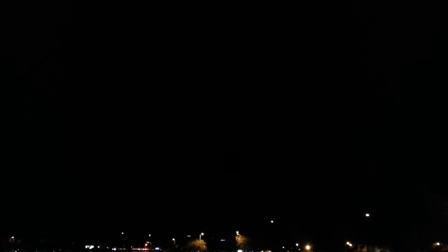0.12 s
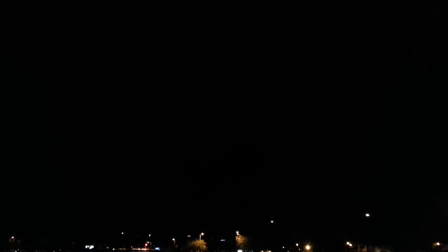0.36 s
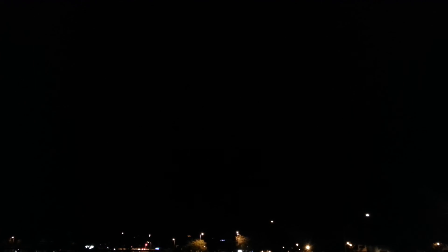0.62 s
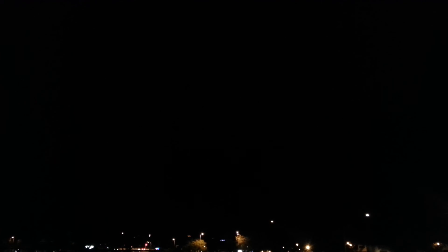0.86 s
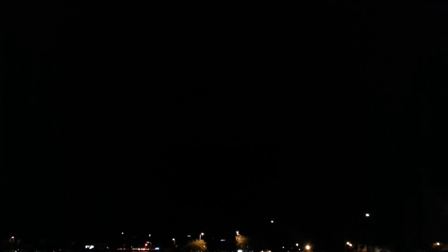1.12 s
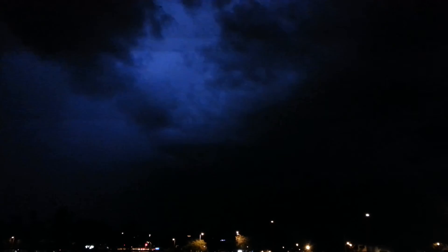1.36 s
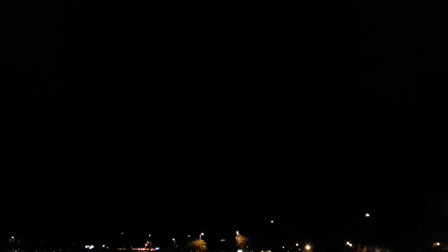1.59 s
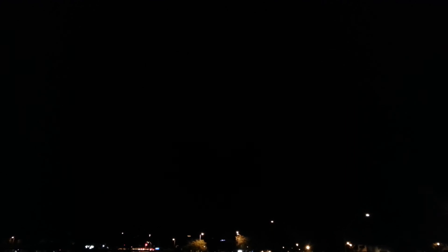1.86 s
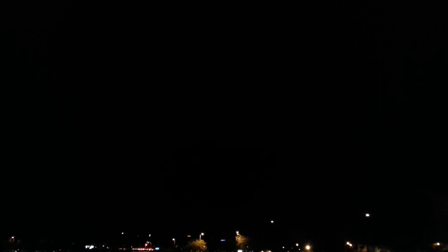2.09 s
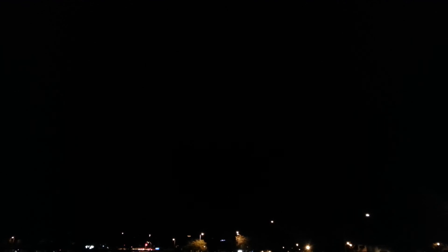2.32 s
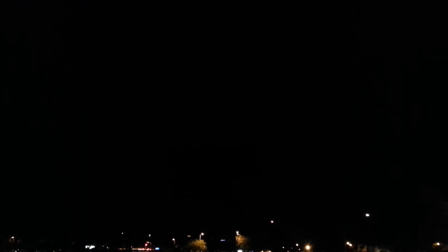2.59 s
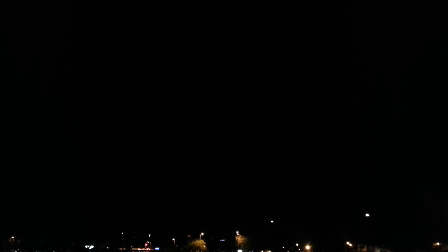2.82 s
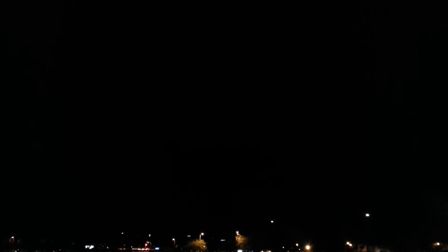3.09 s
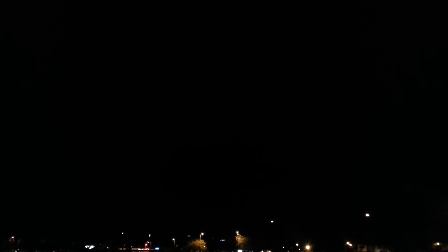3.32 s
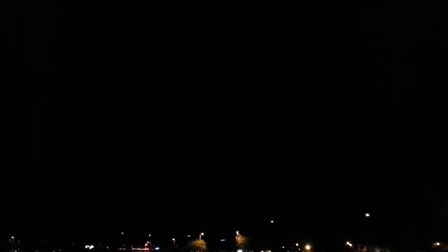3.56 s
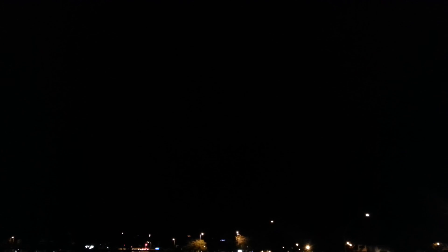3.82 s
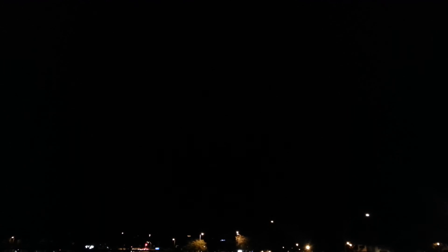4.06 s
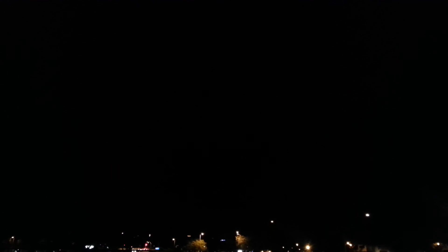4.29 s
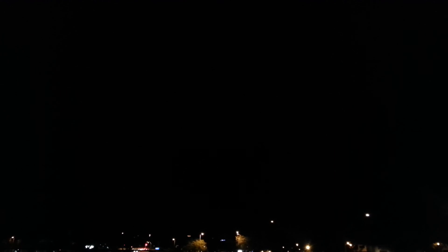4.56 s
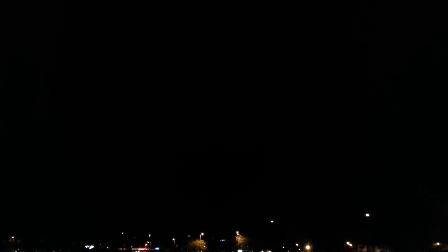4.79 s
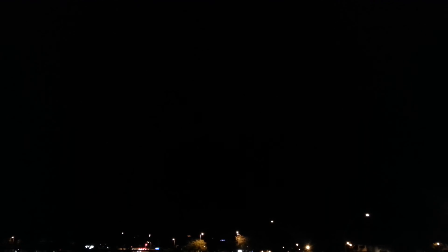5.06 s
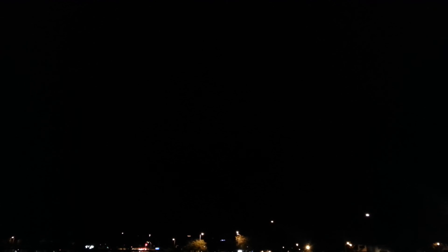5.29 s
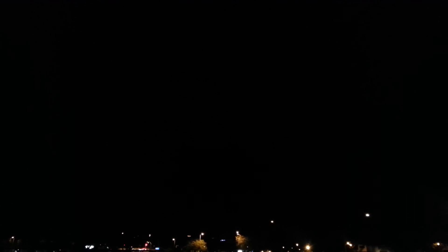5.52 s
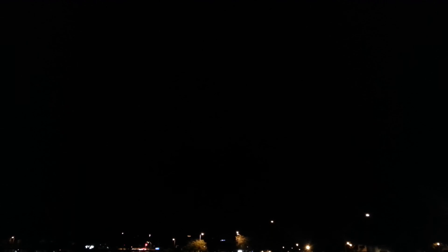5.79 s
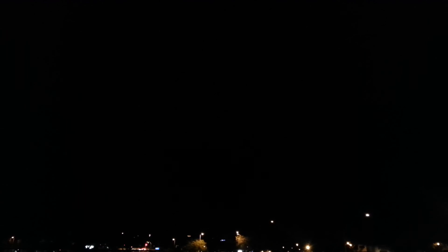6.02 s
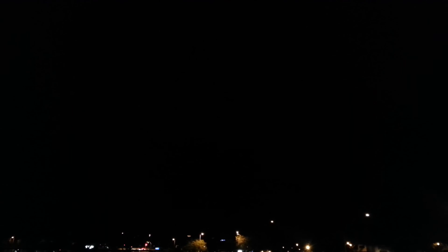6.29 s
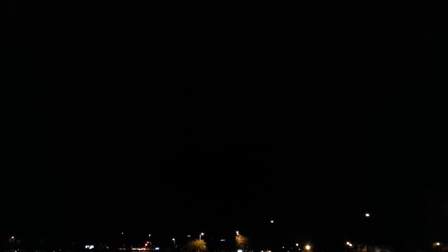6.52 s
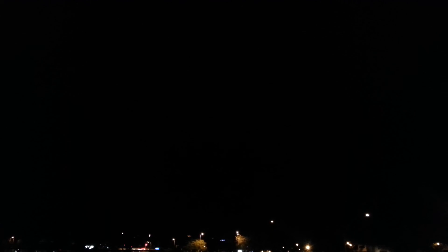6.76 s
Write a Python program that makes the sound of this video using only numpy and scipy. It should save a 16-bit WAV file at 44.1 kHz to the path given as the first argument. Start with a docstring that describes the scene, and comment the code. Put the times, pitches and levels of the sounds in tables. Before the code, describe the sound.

An open night landscape with distant lights, heard through two spaced microphones. At first there is only smooth, faint rain hiss and a low murmur; from about 0.3 s small crackles and a brief patter build. At 0.63 s a near lightning strike cracks with an instant, violent onset, several hard bangs crowded together and clipping. From 0.8 to 3 s rough, tearing thunder continues, with sharp claps knocking through booming peals, heavy low-mid resonance around 2.2 to 2.6 s and another strong blow near 3.1 s. Between 3.2 and 4 s the roll tumbles, briefly thinner, then punches again at 4 s and around 4.5 to 4.7 s. Afterward the peals grow duller and farther off, surging around 4.9, 5.7, 6.1 and 6.5 s with dips between. Rumble still rolls at the 6.9 s end, over soft rain. The image is wide, slightly stronger left.

```python
"""Thunder from a near lightning strike, heard in the open through two spaced microphones.
Shocks from the kinks of the channel crowd into a patter, a crack, then a long roll: random pulses coloured in bands,
dulled by the air path, raised in peals. Straight limbs add single claps: short uneven tone bursts.
Far rain hisses behind: shaped noise. The loudest claps overload the input."""
import sys
import numpy as np
from scipy import signal
from scipy.io import wavfile

SR = 44100
rng = np.random.default_rng(int(sys.argv[2]) if len(sys.argv) > 2 else 0)


def gain_from_db(level_db):
    """Turn a decibel level (scalar or array-like) into a linear amplitude factor."""
    decades = np.asarray(level_db, float) / 20
    return 10 ** decades


def wrap_up_sound(samples):
    """Save the sound to the file named by the first command line argument, as 16-bit audio."""
    columns = np.atleast_2d(samples).T
    # keep every value between -1 and 1, then stretch to whole-number steps
    tamed = np.clip(columns, -1, 1)
    steps = np.round(tamed * 32767).astype(np.int16)
    wavfile.write(sys.argv[1], SR, steps)


N = 303849

# uneven roll under the peals: t/s, level/dB
ROLL_LEVEL = [(0, -37), (.44, -33), (.6295, -29), (.631, -15), (1.5, -13.5), (2.7, -14), (3.0, -21.5),
              (4.2, -20), (4.43, -27.5), (4.9, -16.5), (5.27, -29.5), (5.6, -15), (6.0, -26), (6.89, -20.5)]
# peals swelling out of the roll: t of top/s, level/dB, fade/(dB/s), boom near 200 Hz/dB
PEALS = [(0.306, -29, 201, -2.5), (0.469, -28.5, 401.5, -5.5), (0.552, -18.5, 103, -8.5),
         (.632, -7, 100, -2), (.72, -17, 30.5, 1), (0.801, -14.5, 24, -9), (1.182, -10, 47.5, -11.5),
         (1.4, -14, 25, 0.5), (1.678, -14.5, 17, 2.5), (1.93, -15, 58.5, 7), (1.989, -18, 47.5, 0),
         (2.181, -11.5, 102.5, 0.5), (2.292, -17, 19, 15), (2.499, -12.5, 81, 5), (2.58, -19.5, 21, 14),
         (2.828, -8.5, 66.5, -2), (3.068, -10, 153, 5), (3.172, -11.5, 42.5, 3), (3.35, -15, 73.5, 3),
         (3.47, -13, 98.5, 0), (3.59, -18.5, 80.5, 7.5), (3.662, -12, 24.5, -2), (3.93, -12, 31.5, 3),
         (4.119, -18.5, 29, 2.5), (4.2, -18, 61.5, 2), (4.49, -15.5, 13.5, 0.5), (4.55, -12, 32, 5.5),
         (4.699, -20, 39.5, 10.5), (4.761, -18.5, 25, 6.5), (4.96, -16, 22, 9), (5.071, -17.5, 47, 7),
         (5.32, -17, 39, 7), (5.439, -21.5, 29.5, 2.5), (5.72, -15.5, 30, 0), (6.099, -15, 58.5, -0.5),
         (6.17, -20.5, 59.5, 3.5), (6.471, -13, 299, -1.5), (6.541, -20, 51.5, 0.5), (6.639, -22, 52, 2.5)]
# claps from long straight limbs: t/s, nominal peak before chance/dB, length before decay/s
CLAPS = [(0.301, -26.5, 0.0053), (0.465, -19.5, 0.0034), (.501, -25.5, 0.026), (0.545, -27.5, 0.03),
         (.631, -1.5, .014), (.649, -1.5, .011), (.665, -1.5, .011), (.696, -7.5, 0.0099),
         (0.802, -1, .0025), (.816, -4, .0073), (.901, 1.5, 0.0028), (0.999, -12, .013),
         (1.149, -0.5, 0.0015), (1.174, -2.5, .003), (1.192, -5, 0.0069), (1.263, -11.5, 0.013),
         (1.365, -3, .0129), (1.409, -6.5, 0.01), (1.423, -10.5, .045), (1.671, -9.5, 0.017),
         (1.708, -9, 0.025), (1.773, -1.3, 0.0025), (1.815, -5, 0.018), (1.861, -4.4, 0.0052),
         (1.98, -1.1, 0.0011), (1.999, -5, 0.0061), (2.05, 0.6, .0021), (2.198, -3, 0.00089),
         (2.283, -10, 0.021), (2.377, 0, 0.0015), (2.493, -1.8, 0.0039), (2.51, -12.5, 0.0027),
         (2.688, -4.5, 0.023), (2.718, -3, 0.0057), (2.83, -9.5, 0.0087), (3.078, 3.3, 0.0042),
         (3.178, -15.5, .014), (3.336, -12.5, 0.0059), (3.975, 2, 0.0022), (4.01, -0.7, 0.0025),
         (4.077, -16, 0.0078), (4.459, -14, 0.048), (4.526, -4.5, 0.012), (4.552, -3.5, 0.0089),
         (4.585, -7.5, 0.014), (4.628, -6.5, 0.015), (4.699, -4, 0.016), (4.873, -8.5, 0.024),
         (4.914, -6.5, 0.0041), (5.149, -12, .02), (5.306, -13.5, 0.021), (5.342, -8, .0037),
         (5.386, -6, 0.0074), (5.442, -10.5, 0.0051), (5.732, -4, 0.0056), (5.756, -13, 0.049),
         (6.099, -6.5, .0096), (6.45, -11, 0.011), (6.528, -15, 0.022), (6.855, -10, 0.0042)]
# thunder spectrum before air loss: f/Hz, relative density/dB
THUNDER_COLOUR = [(25, -29), (45, -15), (70, -7.5), (107, -9.5), (167, -0.5), (214, -1.07), (321, -3.5),
                  (437, -2.5), (605, -7.5), (774, -7.5), (969, -12.5), (1400, -13), (2240, -17.5),
                  (2900, -24.5), (3600, -46.5), (6000, -72)]
# absorption by the air: f/Hz, loss/(dB/km)
AIR_LOSS = [(300, 0.), (1000, 2), (2000, 9.5), (4000, 35)]
# path through the air: t/s, distance/km
AIR_PATH = [(0, 1.7), (.4, 0.16), (.63, 0.63), (4.2, 1.117), (5.0, 2.08), (6.89, 1.5)]
# weights of the low-end level changes: f/Hz, share of boom/1, share of deep bass/1
LOW_SHARES = [(110, 0., 1.), (170, 1., .2), (260, 1., 0.), (450, 0., 0.)]
# scattered echoes relative to the direct sound: f/Hz, level/dB
SCATTERED = [(40, -13.), (100, -18), (250, -11), (500, -5), (1000, -5), (2200, -6), (3500, -3)]
# rain spectrum over HISS_DB: f/Hz, relative density/dB
RAIN_COLOUR = [(400, 28), (1000, 32.5), (2000, 22.5), (3200, 15.5), (4500, 10.5), (6000, 3.5), (7500, 5.5),
               (9000, 13), (14000, 12)]
# hiss grows fainter after the crack and returns: t/s, level/dB
HISS_SINKS = [(0, 1), (.6, 1.5), (.72, -11.5), (1.0, -27), (1.6, -15), (2.75, -14), (2.95, -0.9),
              (6.89, 0.5)]
# brief hiss swells below 8.5 kHz: t of top/s, level/dB
HISS_SWELLS = [(4.0, 3), (4.55, 4), (5.721, 5.5), (6.13, 1.5), (6.55, 4)]

BAND_EDGES_HZ = 25 * 2 ** np.arange(0, 9.7, 1 / 3)
RUN_IN_SAMPLES = 8192

HISS_DB, TREBLE_DB = -61, -16   # treble: extra offset of hiss bands centred above 8.5 kHz
TREBLE_DB_PER_HISS_DB = 0.94   # top of the hiss is fainter still while the hiss is faint
SWELL_S = .09   # 1/e half-width

SHOCKS_PER_S, SHOCK_SPREAD_DB = 1200, 0.5
PEAL_RISE_DB_PER_S, ROLL_BOOM_DB = 320.5, 0
CRACK_S, CRACK_RISE_S = .63, .001   # nearest part of the channel arrives at once
DEEP_DB, DEEP_WAVERS_DB = 4.36, 3   # full share up to 110 Hz, none from 260 Hz
HUM_HZ, HUM_WIDTH_HZ, HUM_DB = 208.8, 38, -3.5   # narrow resonance inside the boom

NEAR_CLAP_HZ, FAR_CLAP_HZ, CLAP_SINKS_S = 431.3, 263.3, 1.6   # farther limbs sound lower

LEFT_LAG_MS, LAG_SHRINKS_MS_PER_S = 0.4, 0.024   # from the right, drifting towards the middle
SIDE_DB = 0.5   # left up, right down
LOW_CUT_HZ, CLIP_LEVEL, COUPLING_HZ = 130, .79, 18


def rms_one(x):
    """Scale to unit rms."""
    return x / np.sqrt(np.mean(x ** 2) + 1e-20)


def in_time(rows):
    """Columns joined by straight lines, one value a sample."""
    s, *columns = np.transpose(rows)
    return [np.interp(np.arange(N) / SR, s, c) for c in columns]


def at_hz(points, hz, axis=1):
    """A table column at hz, linear in log frequency."""
    table = np.array(points)
    return np.interp(np.log(hz), np.log(table[:, 0]), table[:, axis])


def band(x, low_hz, high_hz):
    """Band-pass, already ringing at the start: run in on the tail of x."""
    sos = signal.butter(2, [low_hz, high_hz], "band", fs=SR, output="sos")
    run_in = np.concatenate([x[..., -RUN_IN_SAMPLES:], x], axis=-1)
    return signal.sosfilt(sos, run_in)[..., RUN_IN_SAMPLES:]


def drift(corner_hz):
    """Slow chance of unit rms: noise through a double pole, at SR / 40."""
    r = np.exp(-80 * np.pi * corner_hz / SR)
    noise = rng.standard_normal(N // 40 + 2002)
    slow = signal.lfilter([1], [1, -2 * r, r * r], noise)[2000:]
    return np.interp(np.arange(N) / 40, np.arange(len(slow)), rms_one(slow))


def rain():
    """Far, dense rain: smooth hiss, unrelated in the two sides."""
    t = np.arange(N) / SR
    sink_db, = in_time(HISS_SINKS)
    swell_db = sum(db * np.exp(-((t - s) / SWELL_S) ** 2) for s, db in HISS_SWELLS)
    # cancels the swell in the treble
    treble_db = TREBLE_DB + TREBLE_DB_PER_HISS_DB * sink_db - swell_db
    white, out = rng.standard_normal((2, 2, N)), 0
    for k, (low, high) in enumerate(zip(BAND_EDGES_HZ[13::2], BAND_EDGES_HZ[15::2])):
        hz = np.sqrt(low * high)
        colour_db = at_hz(RAIN_COLOUR, hz) + treble_db * (hz > 8500)
        gain = gain_from_db(colour_db + .7 * drift(6))
        out = out + gain * band(white[k % 2], low, high)
    return gain_from_db(HISS_DB + sink_db + swell_db) * out


def to_left(x):
    """Left/right pair: the wave reaches the left microphone a little later."""
    n = np.arange(N)
    lag_ms = LEFT_LAG_MS - LAG_SHRINKS_MS_PER_S * n / SR
    return np.array([np.interp(n - lag_ms * SR / 1000, n, x), x])


def shocks(clump_db):
    """Pressure jumps of nearly equal size and random sign, at random moments, in drifting clumps."""
    size_db = SHOCK_SPREAD_DB * np.minimum(rng.exponential(1, N), 4)
    jumps = gain_from_db(size_db) * rng.choice([-1, 1], N)
    born = rng.random(N) < SHOCKS_PER_S / SR
    return rms_one(jumps * born * gain_from_db(clump_db * drift(23)) + 1e-9)


def peals():
    """Peals rise fast and fade over the uneven roll; powers add, boom is their power-weighted mean."""
    t = np.arange(N) / SR
    power = gain_from_db(2 * in_time(ROLL_LEVEL)[0])
    boom = power * ROLL_BOOM_DB
    for s, db, fade_db_per_s, boom_db in PEALS:
        fall_db = np.where(t < s, PEAL_RISE_DB_PER_S * (s - t), abs(fade_db_per_s) * (t - s))
        peal = gain_from_db(2 * (db - fall_db))
        if s >= CRACK_S - .01:   # silent until the crack
            peal = peal * np.clip((t - CRACK_S) / CRACK_RISE_S, 0, 1) ** 2
        power, boom = power + peal, boom + peal * boom_db
    return np.sqrt(power), boom / power


def roll():
    """Crowd of shocks coloured by band and air path; scattered echoes differ between the sides."""
    level, boom_db = peals()
    deep_db = DEEP_DB + DEEP_WAVERS_DB * drift(3.9)
    km, = in_time(AIR_PATH)
    crowd, echoes = shocks(clump_db=0.9), rng.standard_normal((2, 2, N))
    direct, scattered = 0, 0
    for k, (low, high) in enumerate(zip(BAND_EDGES_HZ[:24], BAND_EDGES_HZ[1:25])):
        hz = np.sqrt(low * high)
        colour_db = at_hz(THUNDER_COLOUR, hz) - at_hz(AIR_LOSS, hz) * km
        colour_db += at_hz(LOW_SHARES, hz) * boom_db + at_hz(LOW_SHARES, hz, axis=2) * deep_db
        gain = gain_from_db(colour_db + 2.0 * drift(2.3))
        direct = direct + (-1) ** k * gain * band(crowd, low, high)   # alternate signs join the bands
        scattered = scattered + gain * gain_from_db(at_hz(SCATTERED, hz)) * band(echoes[k % 2], low, high)
    hum = band(shocks(clump_db=0.5), HUM_HZ - HUM_WIDTH_HZ / 2, HUM_HZ + HUM_WIDTH_HZ / 2)
    direct = direct + gain_from_db(HUM_DB + boom_db) * hum
    return level * rms_one(to_left(direct) + scattered)


def claps():
    """N-shaped shocks with quick echoes, drawn as a few uneven cycles that swell and die."""
    out, chance = np.zeros(N), rng.standard_normal((len(CLAPS), 3, 64))
    for (s, peak_db, length_s), luck in zip(CLAPS, chance):
        start = round(s * SR)
        hz = FAR_CLAP_HZ + (NEAR_CLAP_HZ - FAR_CLAP_HZ) * np.exp(-(s / CLAP_SINKS_S) ** 2 / 2)
        t = np.arange(min(int((length_s + 0.015) * SR), N - start)) / SR
        # fresh chance each nominal half cycle
        stretch, height, steep = (np.interp(2 * t * hz, np.arange(64), row) for row in luck)
        phase = 2 * np.pi * np.cumsum(hz * np.exp(0.3262 * stretch)) / SR
        wave = np.sin(phase) + 0.2 * np.sin(2 * phase + steep) + 0.05 * np.sin(3 * phase + 2 * steep)
        swell = (1 - np.exp(-t / 0.00098)) * np.exp(-np.maximum(t - length_s, 0) / .0025)
        out[start:][:len(t)] += gain_from_db(peak_db + 0.83 * height) * swell * wave
    return to_left(out)


def scene():
    """Thunder, slightly stronger on the left, over rain."""
    thunder = roll() + claps()
    return thunder * gain_from_db(np.array([[SIDE_DB], [-SIDE_DB]])) + rain()


def low_pass(x):
    """Removes everything above the highest recorded frequency."""
    return signal.sosfilt(signal.butter(12, 14600, fs=SR, output="sos"), x)


def record(dry):
    """Microphones lose deep bass, the input clips hard, a coupling high-pass tilts the flat tops."""
    low_cut = signal.butter(2, LOW_CUT_HZ, "high", fs=SR, output="sos")
    coupling = signal.butter(1, COUPLING_HZ, "high", fs=SR, output="sos")
    heard = signal.sosfilt(low_cut, dry)
    clipped = np.clip(heard, -CLIP_LEVEL, CLIP_LEVEL)
    coupled = signal.sosfilt(coupling, clipped)
    return low_pass(coupled)


dry = scene()
out = record(dry)
wrap_up_sound(out)
```